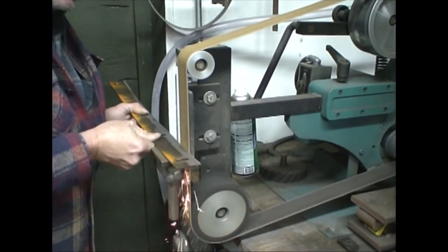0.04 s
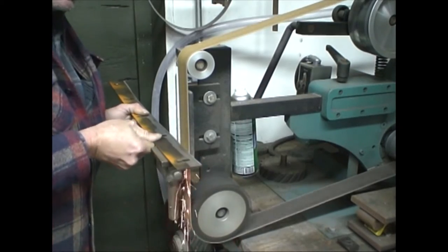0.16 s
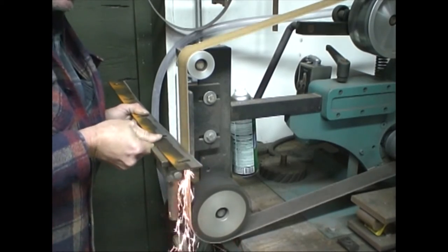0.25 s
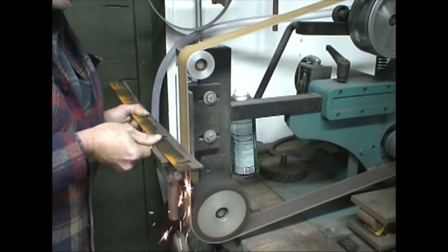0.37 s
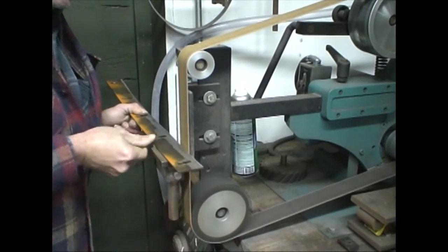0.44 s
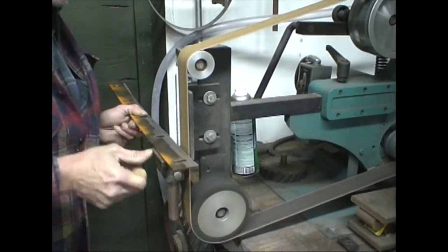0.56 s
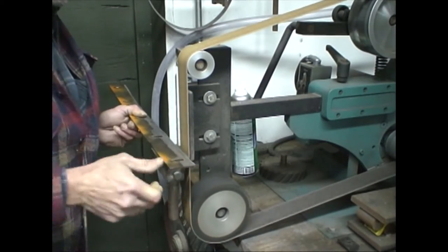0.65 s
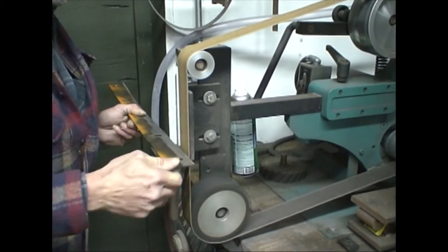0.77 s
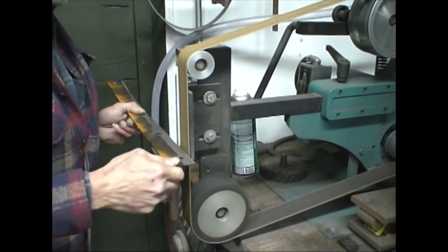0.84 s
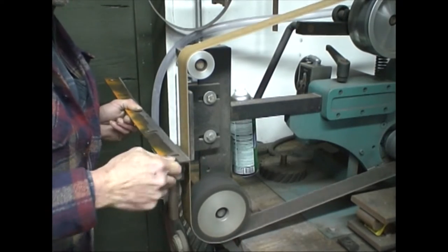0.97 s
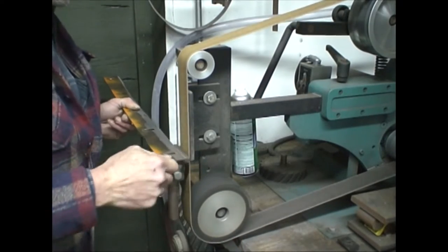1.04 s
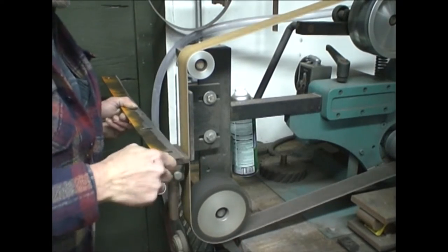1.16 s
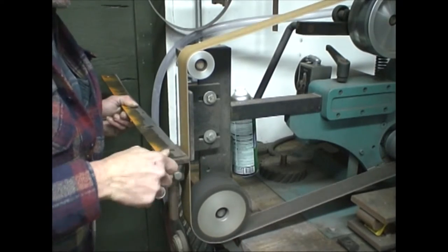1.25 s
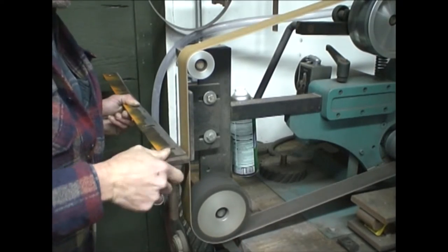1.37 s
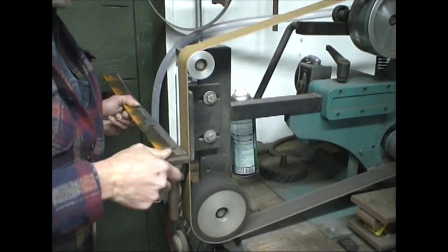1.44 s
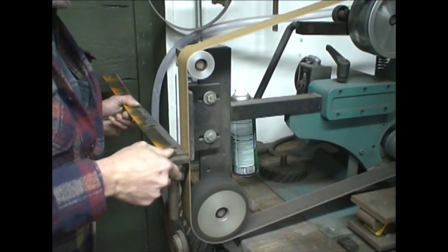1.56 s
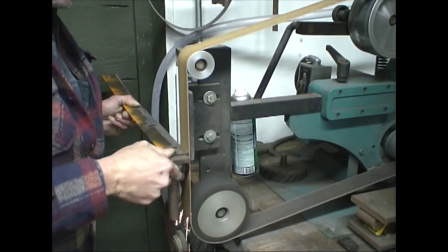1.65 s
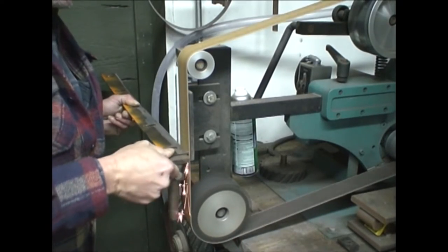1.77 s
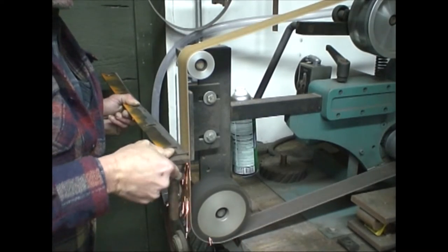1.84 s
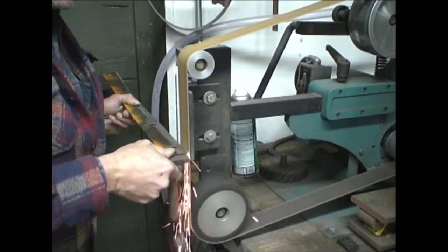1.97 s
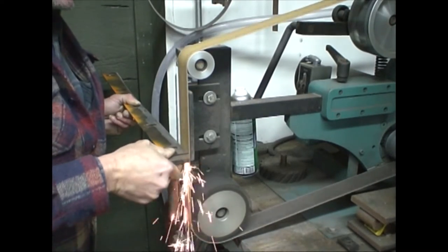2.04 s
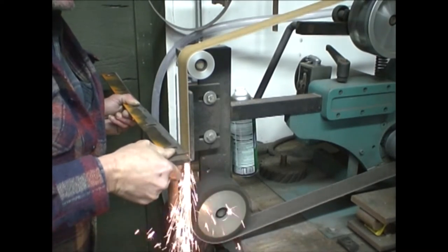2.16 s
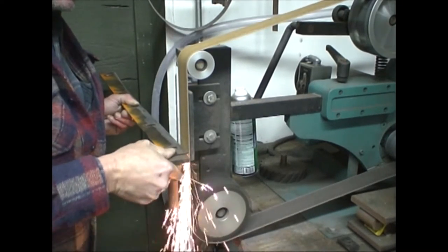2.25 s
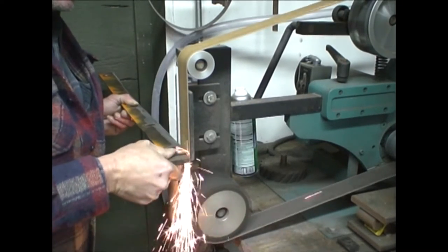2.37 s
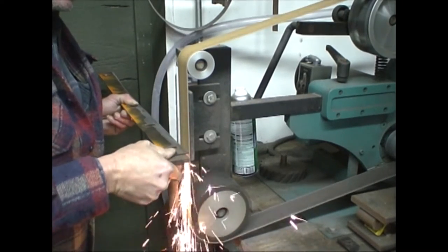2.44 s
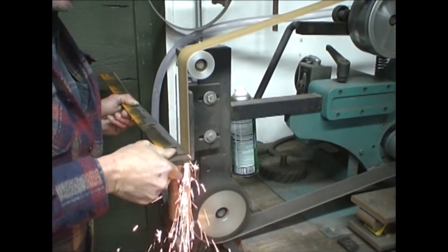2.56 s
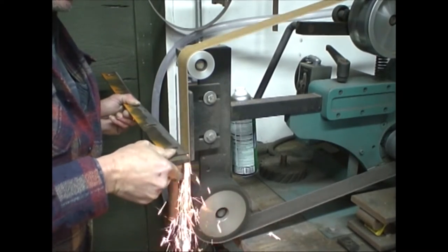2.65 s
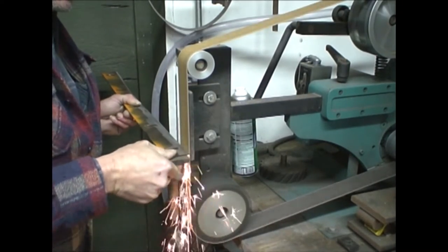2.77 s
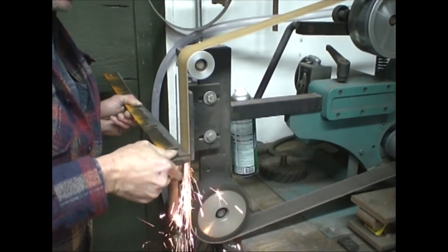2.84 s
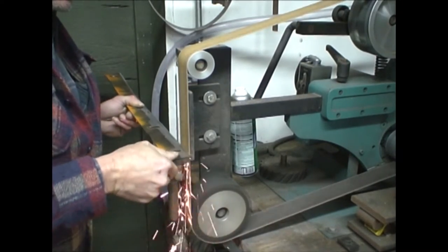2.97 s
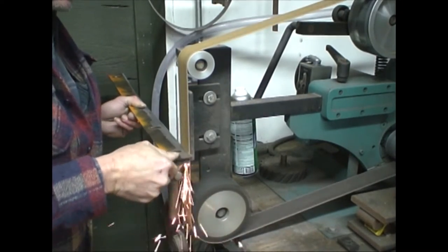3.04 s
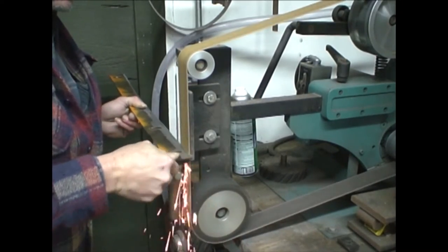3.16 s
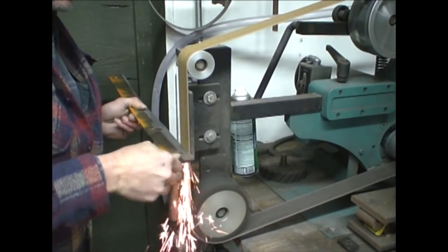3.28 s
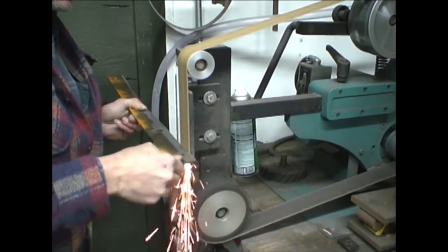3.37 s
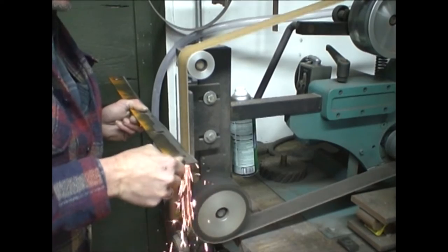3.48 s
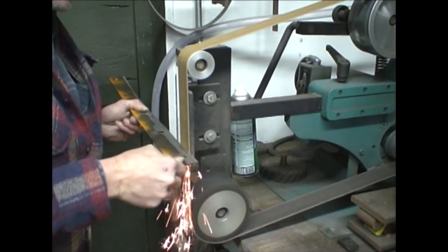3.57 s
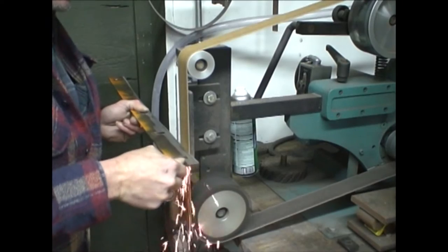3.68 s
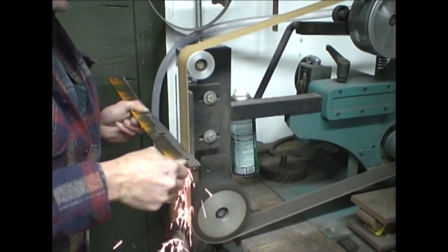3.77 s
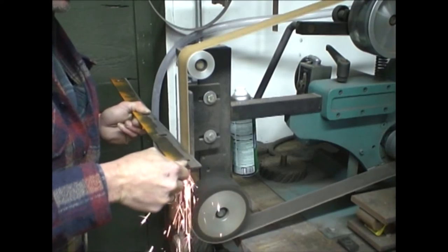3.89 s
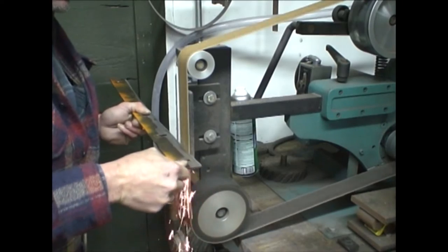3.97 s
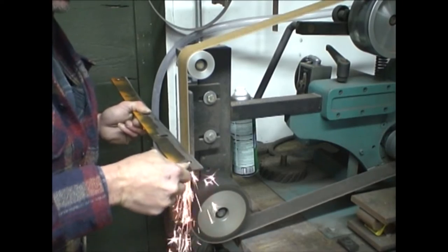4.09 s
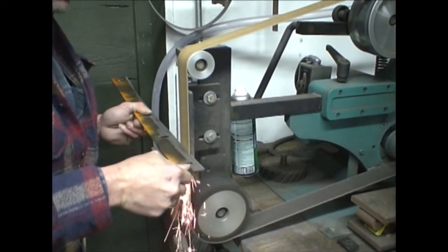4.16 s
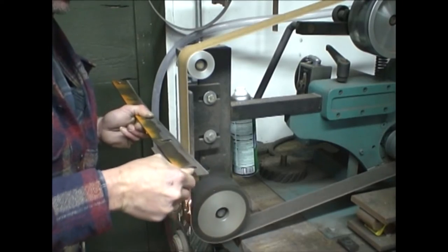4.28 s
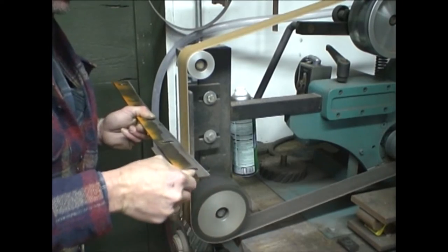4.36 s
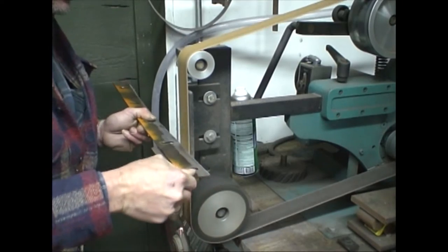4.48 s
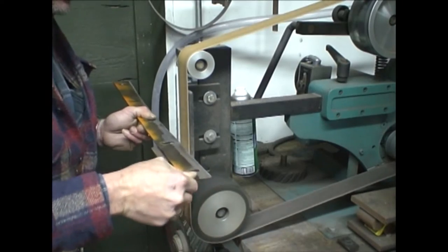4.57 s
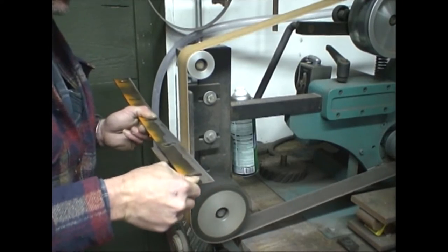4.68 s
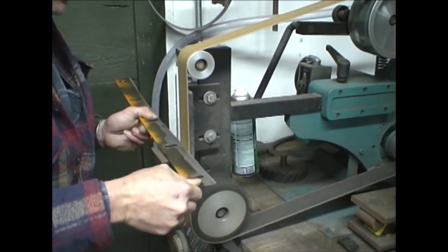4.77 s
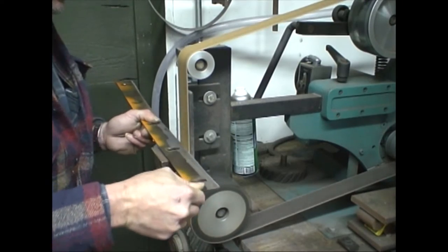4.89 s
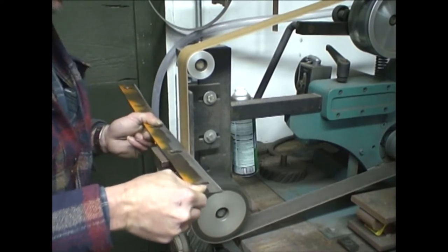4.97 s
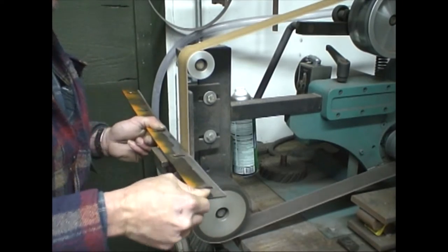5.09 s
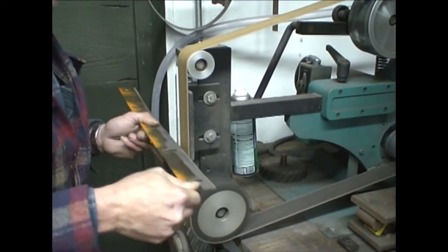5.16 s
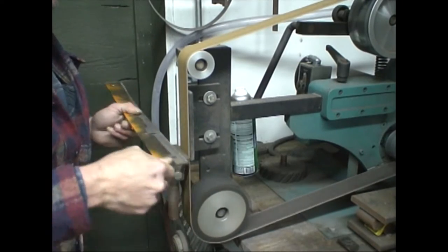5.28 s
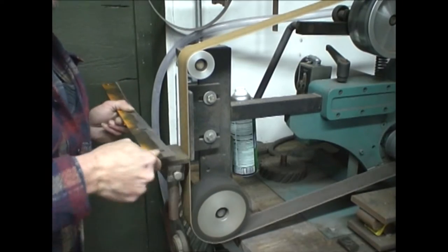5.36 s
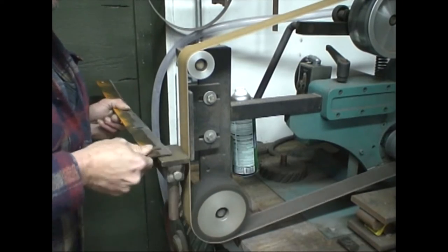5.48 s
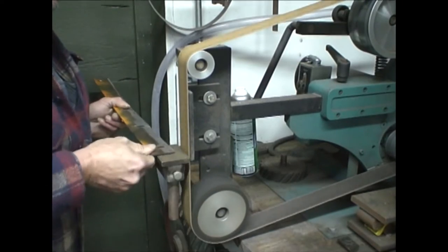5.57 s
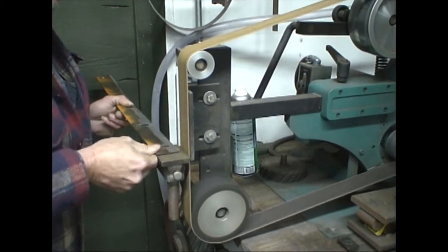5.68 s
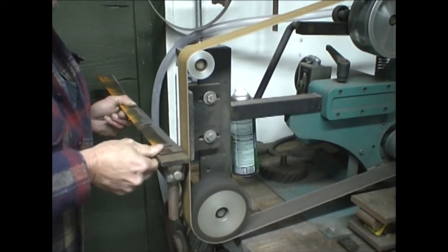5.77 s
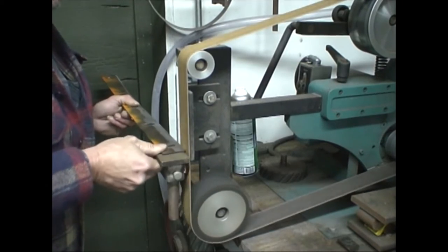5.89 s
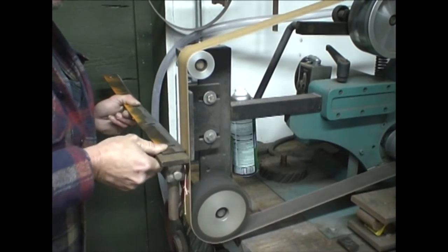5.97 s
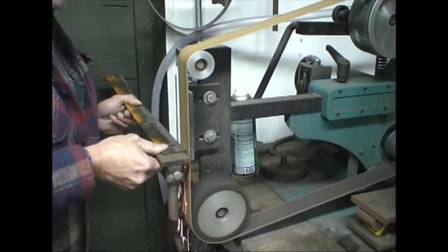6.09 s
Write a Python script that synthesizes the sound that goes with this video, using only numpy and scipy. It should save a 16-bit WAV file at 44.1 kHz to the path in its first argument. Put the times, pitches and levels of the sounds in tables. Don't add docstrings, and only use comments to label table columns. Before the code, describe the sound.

Steel blade ground on a belt sander: a short tail of fierce hiss, a second of bare motor hum and belt rush, then a sharp landing and a long sizzling draw whose metallic ringing shifts in pitch and pressure. It lifts, the machine recovers, and a faint new contact follows. Small, slightly reverberant shop; automatic gain pushes the machine down during grinding.

```python
import sys
import numpy as np
from scipy import signal
from scipy.fft import rfft, irfft, next_fast_len
from scipy.io import wavfile
from scipy.ndimage import uniform_filter1d

SR = 44100
rng = np.random.default_rng(int(sys.argv[2]) if len(sys.argv) > 2 else 0)


def volts_from_db(level):
    exponent = np.asarray(level, float) / 20
    return 10 ** exponent


def bounce(signal):
    frames = np.transpose(np.atleast_2d(signal))
    limited = np.clip(frames, -1, 1)
    pcm = np.round(limited * 32767).astype(np.int16)
    wavfile.write(sys.argv[1], SR, pcm)


N = 270333
TIME = np.arange(N) / SR
PAD = next_fast_len(N + SR)
HZ = np.maximum(np.arange(PAD // 2 + 1) * SR / PAD, 1)
SIZZLE_HZ = 16600


def rms_one(x):
    return x / np.sqrt(np.mean(x ** 2) + 1e-20)


def at_hz(points):
    hz, value = np.transpose(points)
    return np.interp(np.log(HZ), np.log(hz), value)


def colour(x, gain):
    return irfft(rfft(x, PAD) * gain, PAD)[..., :N]


def drift(rate):
    step = 40
    r = np.exp(-2 * np.pi * rate * step / SR)
    noise = rng.standard_normal(N // step + 2002)
    slow = signal.lfilter([1], [1, -2 * r, r * r], noise)[2000:]
    return np.interp(np.arange(N) / step, np.arange(len(slow)), rms_one(slow))


def resonate(x, hz, width):
    r = np.exp(-np.pi * width / SR)
    zeros = np.array([1, 0, -1]) * (1 - r * r) / 2
    return signal.lfilter(zeros, [1, -2 * r * np.cos(2 * np.pi * hz / SR), r * r], x)


def added_resonance(x, hz, width, db):
    return (volts_from_db(db) - 1) * resonate(x, hz, width)


def grains(per_s, spread_db):
    sizes = volts_from_db(spread_db * np.minimum(rng.exponential(1, N), 4)) * rng.choice([-1, 1], N)
    return rms_one(sizes * (rng.random(N) < per_s / SR))


def belt_turn(depth_db):
    belt_hz = 7.67
    pattern = np.zeros(N)
    for k, phase in enumerate(rng.uniform(0, 2 * np.pi, 12), start=1):
        pattern += np.sin(2 * np.pi * k * belt_hz * TIME + phase)
    return depth_db * rms_one(pattern)


def motor_hum():
    hum_hz = 120.03
    phase, capsule_db = np.array([[.11], [-.11]]), [[-.5], [.5]]
    return np.sqrt(2) * np.sin(2 * np.pi * hum_hz * TIME + phase) * volts_from_db(capsule_db)


def belt_rush():
    # (frequency [Hz], density [dB per Hz])
    rush_spectrum = [(20, -22), (30, -22), (47, -18), (95, -10.5), (135, -9), (160, -4), (400, 0),
                     (900, -7), (1300, -7), (1900, -7), (4800, -4.5), (8800, -8.5), (13000, -7.5),
                     (16000, -13)]
    # (frequency [Hz], width [Hz], lift [dB])
    frame_modes = [(187, 49, 2), (343, 47, 3), (681, 60, 3.5), (1265, 106, 4.5), (3305, 210, 3),
                   (4700, 240, 2.5), (6200, 98, 1.5), (7000, 150, 0.5), (10500, 260, 2)]
    source = colour(grains(30000, spread_db=2.5), volts_from_db(at_hz(rush_spectrum)))
    rush = source.copy()
    for hz, width, db in frame_modes:
        rush += added_resonance(source, hz, width, db)
    over_hum_db = 8.5
    return volts_from_db(over_hum_db + belt_turn(depth_db=-0.8) + 0.78 * drift(0.97)) * rms_one(rush)


def bearing_whines():
    # (frequency [Hz], width [Hz], level over the hum [dB])
    whine_tones = [(59.7, 1.5, -24), (238.5, 6, -17), (418, 1.5, -12), (836.1, 0.8, -12), (701, 2, -20),
                   (1314, 5, -20), (1405, 3, -17.5), (1550, 8, -19)]
    whines = np.zeros(N)
    for hz, width, db in whine_tones:
        wander = np.cumsum(2 * np.pi * width * drift(6.25) / SR)
        whines += np.sqrt(2) * volts_from_db(db + 0.48 * drift(9)) * np.sin(2 * np.pi * hz * TIME + wander)
    return whines


def contact():
    # (touch [s], lift [s], first contact [cm], bite on landing [dB])
    strokes = [
        (-0.2, 0.4, 10, 0.0),
        (1.599, 5.085, 0.0, 4.5),
        (5.9, 6.4, 1.5, -8.0),
    ]
    touch_s, lift_s, bite_s = 0.034, 0.081, 0.057
    draw_cm_per_s = 10
    touch, place = np.zeros(N), np.zeros(N)
    for start, end, first_cm, bite_db in strokes:
        since = TIME - start
        held = np.clip(np.minimum(since / touch_s, (end - TIME) / lift_s + .5), 0, 1)
        touch += held * volts_from_db(bite_db * np.exp(-np.abs(since) / bite_s))
        place = np.where(since > -.1, first_cm + draw_cm_per_s * since, place)
    return touch, place


def hand():
    # (time [s], pressure as hiss over the hum [dB], blade flex [dB], bevel on the belt [dB],
    #  finest sizzle [dB])
    hand_moves = [(0.0, 22, -12, -6.5, 2.5), (0.25, 21.5, -9, -5, 2), (0.37, 22.5, -10, -3.5, -0.5),
                  (1.72, 9, -8.5, -8.5, 6.5), (1.95, 12, -5, -4.5, 5), (2.2, 12, -2, -3.5, -13),
                  (2.47, 10.5, -3.5, -2.5, 6), (2.78, 11, -6, -8, 3.5), (3.0, 13, -4.5, -7.5, 3.5),
                  (3.17, 20, -9, -7.5, 3.5), (3.4, 12.5, -0.5, -6.5, 4), (3.51, 19.5, -7.5, -5, 6),
                  (3.82, 20, -6, -4, 6), (4.15, 20, -8, -1.5, 4), (4.48, 26, -14, -8.5, -16),
                  (4.65, 21.5, -9, -5, -0.5), (5.07, 21.5, -9, -6, -4), (6.0, 11, -8.5, -6.5, 5)]
    seconds, *columns = np.transpose(hand_moves)
    return [np.interp(TIME, seconds, db) for db in columns]


def grit_hiss(grit, touch, press, flex, bevel):
    zone_edges = [900, 2500, 5000, 9000, 15800]
    # (frequency [Hz], density [dB per Hz])
    grit_spectrum = [(120, -65), (400, -16.5), (700, -13), (930, -15.5), (1800, -8), (2900, -2.5),
                     (5000, 0), (7000, 1), (8800, -1), (10200, -1.5), (11800, 1.5), (13500, 1.5),
                     (14800, -2), (16000, -4.5)]
    edges, shape = np.array(zone_edges), volts_from_db(at_hz(grit_spectrum))
    centres = np.sqrt(edges[1:] * edges[:-1])
    pressure_db = belt_turn(depth_db=0.4) + .5 * drift(3.9) + 0.65 * drift(29)
    body_db = 1 + 0.39 * press + 0.84 * flex
    hiss = np.zeros(N)
    for k, zone_db in enumerate([body_db, press + flex, press + bevel, press]):
        hat = np.interp(np.log(HZ), np.log(centres), np.arange(4) == k) * (HZ < SIZZLE_HZ)
        inside = (HZ > edges[k]) & (HZ < edges[k + 1])
        full = np.sqrt(2 * np.sum(shape[inside] ** 2) / PAD)
        level = volts_from_db(zone_db) / full * volts_from_db(pressure_db + 0.88 * drift(3.8))
        hiss += touch * level * colour(grit, shape * hat)
    return hiss


def blade_ring(hiss, place):
    # (frequency [Hz], level over the hiss [dB], antinode [cm], antinode spacing [cm], reach [cm])
    blade_modes = [(700, 7.0, 11.8, 60, 6.8), (1280, 4.5, 24.5, 23.5, 2.1), (1660, 5.5, 8.5, 60, 5.5),
                   (1885, 5.5, 5.7, 16.8, 3.3), (2780, 4.5, 8.0, 15, 4.5), (5090, 5.0, 6.0, 18.5, 2.1),
                   (5780, 5.5, 6.6, 60, 1.9), (6810, 5.0, 5.8, 5.9, 1.7), (7190, 6.5, 6.4, 60, 2.1),
                   (7920, 6.5, 7.0, 60, 2.5), (9190, 5.0, 29, 60, 2.4), (10370, 6.0, 27.5, 60, 6.5),
                   (10990, 6.0, 33.2, 60, 1.8), (11720, 3.0, 7.5, 19.5, 2.4)]
    loss_factor = .65 * .018
    flicker = drift(8)
    ring = np.zeros(N)
    for hz, db, antinode, spacing, reach in blade_modes:
        db = db + 2.5 + 2.5 * (hz < 800) + 1.5 * (hz < 1500) + 2 * (hz < 2300)
        away = np.abs((place - antinode + spacing / 2) % spacing - spacing / 2)
        near = np.clip((reach - away) / 3 + .45, 0, 1)
        grip = volts_from_db(2.35 * np.roll(flicker, int(hz * 37)))
        ring += near * grip * added_resonance(hiss, hz, loss_factor * hz, db)
    return ring


def thin_tip(hiss, place):
    # (frequency [Hz], width [Hz], change [dB], from place [cm])
    hiss_regions = [
        (10400, 1100, 3, 22),
        (12300, 1300, 1.5, 26),
        (2180, 800, -10, 31.5),
        (15500, 220, 6, -9),
    ]
    change = np.zeros(N)
    for hz, width, db, from_cm in hiss_regions:
        change += np.clip((place - from_cm) / 2, 0, 1) * added_resonance(hiss, hz, width, db)
    return change


def brief_swells(hiss):
    # (start [s], duration [s], frequency [Hz], width [Hz], level over the hiss [dB])
    swell_events = [(0.21, .1, 4500, 1500, 4), (1.62, .05, 3300, 1200, 5), (2.0, .55, 12300, 1200, 2.5),
                    (2.1, .4, 6200, 1800, 1.5), (2.9, .1, 2800, 2000, 2.5), (3.02, .26, 10600, 1500, 3),
                    (3.36, 0.092, 3800, 2000, 2), (3.78, .1, 5150, 170, 9), (4.19, .13, 5860, 70, 9),
                    (4.3, .27, 700, 700, 10.0), (4.3, .3, 9800, 3000, 2.0), (3.37, .18, 6020, 60, 7.0),
                    (4.62, .42, 11720, 100, 4.0), (4.65, .35, 4300, 900, 2.5), (2.1, .45, 4200, 900, -2.5),
                    (3.95, .12, 3000, 1500, -3.0), (3.08, .2, 2600, 2000, -2.5), (0.0, .4, 7410, 40, 7.0),
                    (1.62, .22, 7560, 40, 7.0), (2.6, .37, 6820, 90, 5.0), (1.6, .25, 1900, 1200, -4.0),
                    (5.9, .25, 2000, 900, -4.0)]
    edge_s = .04
    cries = np.zeros(N)
    for start, lasting, hz, width, db in swell_events:
        inside_s = np.minimum(TIME - start, start + lasting - TIME)
        swell = np.clip(inside_s / edge_s + .5, 0, 1)
        cries += swell * added_resonance(hiss, hz, width, db)
    return cries


def blade():
    grit = grains(26000, spread_db=3.0)
    touch, place = contact()
    press, flex, bevel, sizzle_db = hand()
    hiss = grit_hiss(grit, touch, press, flex, bevel)
    steel = blade_ring(hiss, place) + thin_tip(hiss, place) + brief_swells(hiss)
    sizzle = touch * volts_from_db(press + sizzle_db - 3.5) * rms_one(colour(grit, HZ > SIZZLE_HZ))
    return hiss + steel + sizzle


def placed(x, side, pan):
    t60_s, room_db = 0.34, -6
    tail = np.arange(SR // 2) / SR
    echoes = rng.standard_normal((2, len(tail))) * volts_from_db(-60 * tail / t60_s) * (tail > .003)
    echoes = rfft(echoes / np.linalg.norm(echoes, axis=1, keepdims=True), PAD)
    wet = volts_from_db(room_db) * HZ / (HZ + 600)
    mid = (1 + wet * echoes[0]) / np.sqrt(1 + wet ** 2)
    lean = np.tanh(at_hz(pan) * np.log(10) / 40)
    diffuse = np.sqrt(np.maximum(volts_from_db(2 * at_hz(side)) - lean ** 2, 1e-4)) * echoes[1]
    return colour(x, np.array([mid * (1 + lean) + diffuse, mid * (1 - lean) - diffuse]))


def scene():
    # (frequency [Hz], side minus mid [dB])
    machine_side = [(30, -5), (110, -14), (200, -13), (380, -13), (700, -5.5), (1290, -7), (2380, -7),
                    (4400, -5), (8000, -3.5), (11300, -4), (11700, -9), (14000, -9.5), (16000, -8)]
    blade_side = [(400, -12), (700, -9), (1290, -9), (2380, -9), (3400, -9), (4400, -7.5), (7300, -5.5),
                  (8100, -5.5), (10700, -4.5), (11350, -5), (11550, -24), (16000, -26)]
    # (frequency [Hz], left minus right [dB])
    machine_pan = [(30, -.7), (110, 0), (200, -2.5), (380, -1.5), (700, -5), (1290, -4), (2380, -2),
                   (4400, -2), (8120, -4.5), (15000, -3)]
    blade_pan = [(60, -0.5), (110, -9), (200, -1.0), (380, -4), (700, -7), (1290, -1), (2380, -2),
                 (4400, 1.5), (8120, -0.5), (15000, -1.5)]
    machine = belt_rush() + bearing_whines()
    return motor_hum() + placed(machine, machine_side, machine_pan) + placed(blade(), blade_side, blade_pan)


def lag(x, seconds, start):
    r = np.exp(-1 / (seconds * SR))
    return signal.lfilter([1 - r], [1, -r], x, zi=[r * start])[0]


def gain_control(dry):
    gain_db, knee_db, duck_per_db = -32.5, 14.5, 1.18
    listen_s, attack_s, release_db_per_s = 0.056, 0.0096, 32
    memory_s, memory_share = 1, 0.089
    sensed = colour(dry, 1 / np.hypot(1, HZ / 20100))
    power = np.mean(sensed ** 2, axis=0)
    level_db = 10 * np.log10(uniform_filter1d(power, int(listen_s * SR), mode="reflect") + 1e-12)
    duck = duck_per_db * np.maximum(level_db - knee_db, 0)
    release = release_db_per_s * TIME
    duck = np.maximum.accumulate(duck + release) - release
    duck = lag(duck, attack_s, duck[0]) + memory_share * lag(duck, memory_s, 0)
    return dry * volts_from_db(gain_db - duck)


def top_cut(x):
    return signal.sosfilt(signal.butter(12, 15940, fs=SR, output="sos"), x)


def record(dry):
    heard = colour(gain_control(dry), HZ < 15860)
    return top_cut(heard)


dry = scene()
out = record(dry)
bounce(out)
```